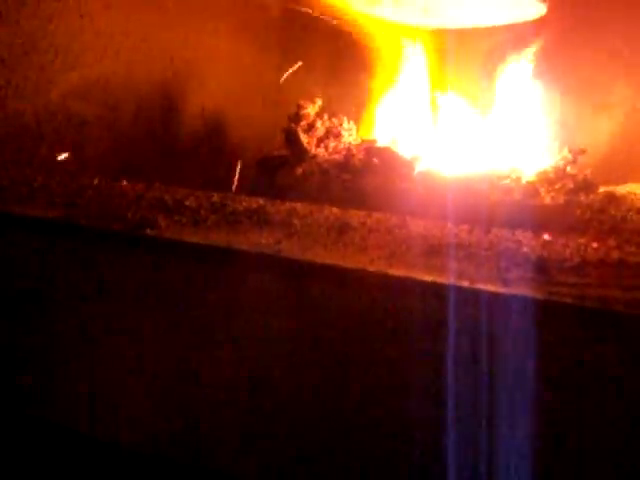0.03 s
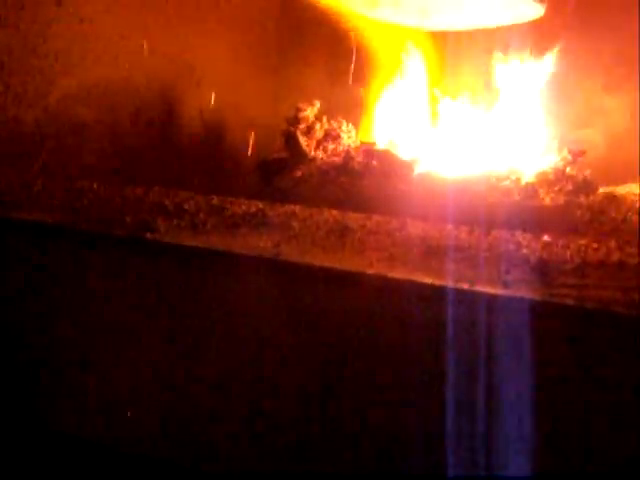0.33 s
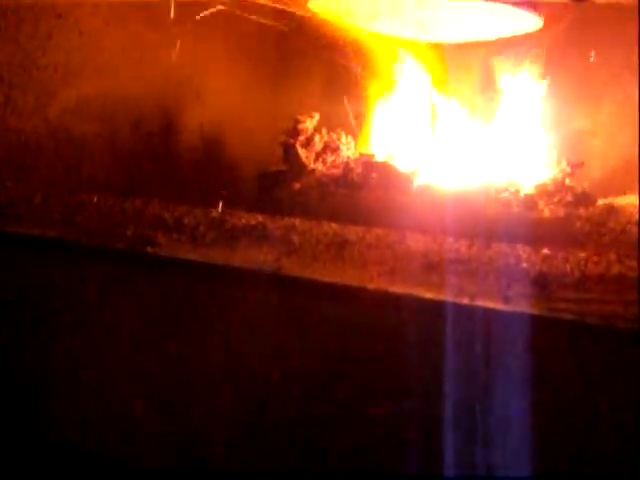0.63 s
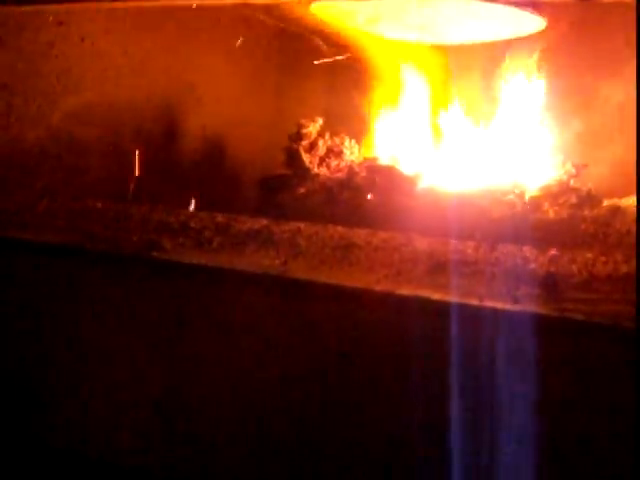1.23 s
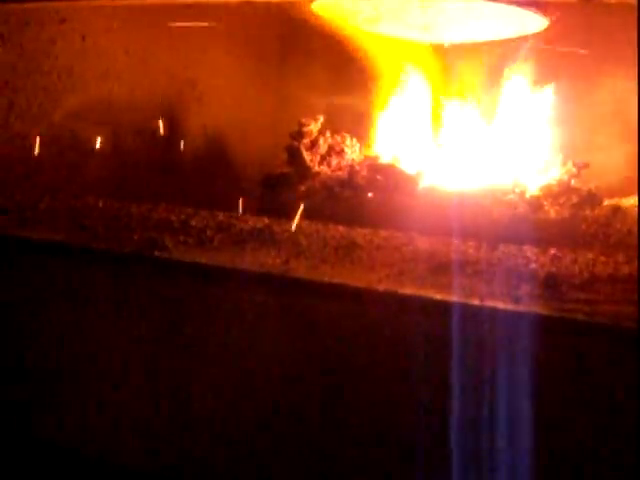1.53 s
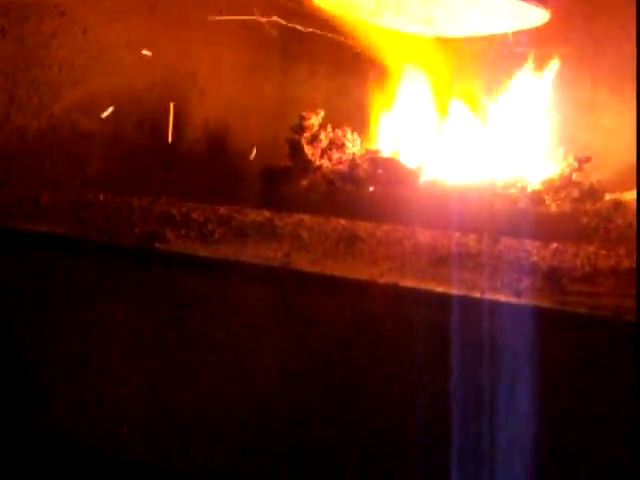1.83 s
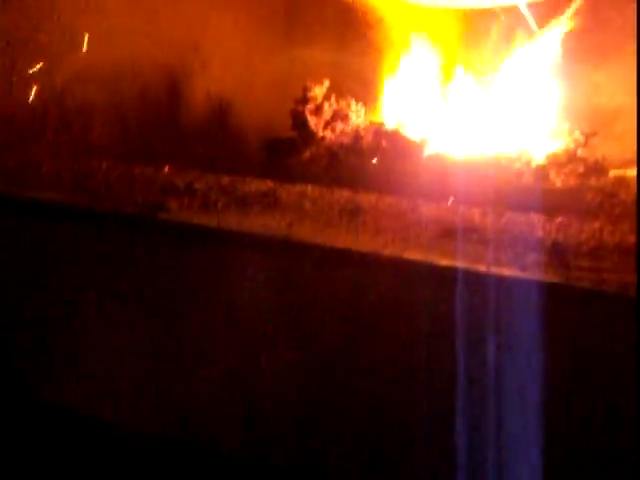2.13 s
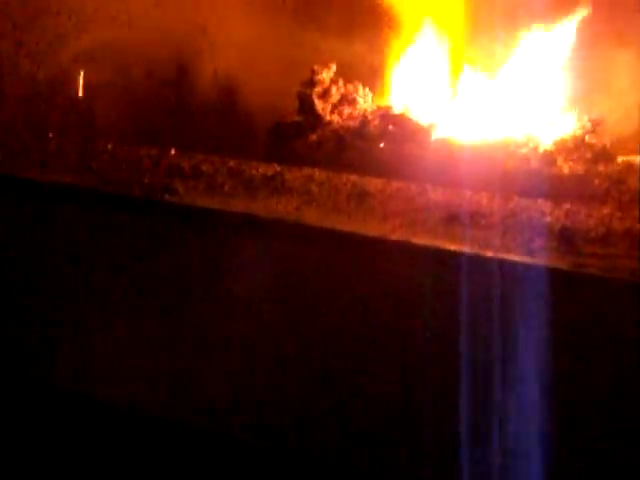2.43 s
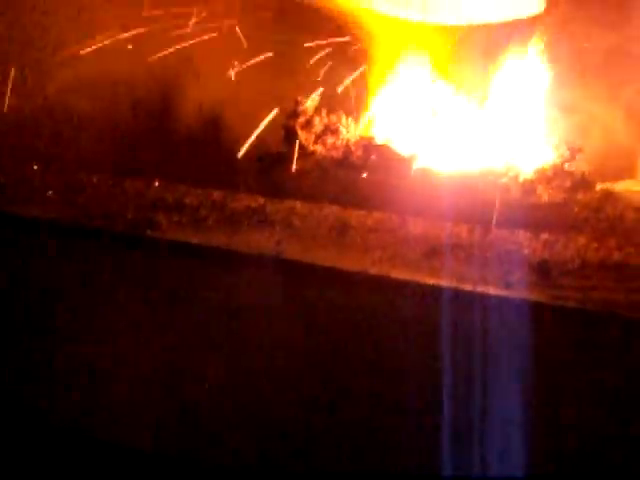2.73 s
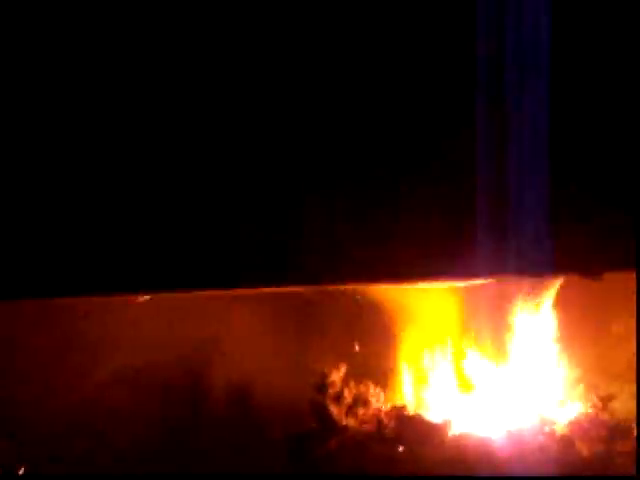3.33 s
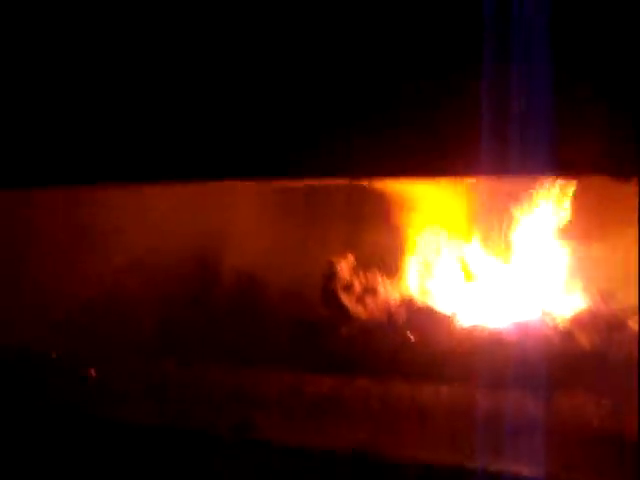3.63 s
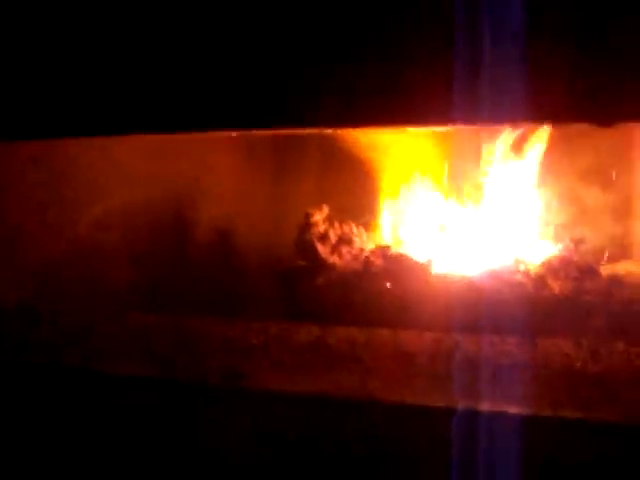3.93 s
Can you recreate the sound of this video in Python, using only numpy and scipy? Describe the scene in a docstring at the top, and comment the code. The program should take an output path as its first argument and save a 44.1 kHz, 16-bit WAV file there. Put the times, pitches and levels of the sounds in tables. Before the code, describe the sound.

Furnace flames roar steadily over a low, uneven rumble, close by at the open door. Forced air hisses evenly through the burning coal, with one clear snap early on and faint crackling all the way through.

```python
"""Coal furnace at the open fire door

A coal fire burns under forced draught in an iron furnace. The flames rumble in the low modes
of firebox and flue, drone in the standing waves and roar through the higher resonances.
The blower's air hisses through the coal bed, and the coal crackles faintly, with one clear snap."""
import sys
import numpy as np
from scipy.fft import rfft, irfft, next_fast_len
from scipy.io import wavfile
from scipy.ndimage import uniform_filter1d, map_coordinates

SR = 44100
rng = np.random.default_rng(int(sys.argv[2]) if len(sys.argv) > 2 else 0)


def waveform_to_disk(signal):
    """Save audio, clipped to [-1, 1], as 16-bit WAV at the path in sys.argv[1]."""
    frames = np.transpose(np.atleast_2d(signal))
    scaled = np.clip(frames, -1, 1) * 32767
    samples = np.round(scaled).astype(np.int16)
    wavfile.write(sys.argv[1], SR, samples)


N = 176400

# Deepest modes, of firebox and flue together. Each row: centre in Hz, width in Hz, relative level in dB.
FLUE_MODES = [(43, 15, -11.5), (59.9, 9.7, -0.5), (84.7, 13.4, 0)]
# Surges of the flames. Each row: time in seconds, gain on the rumble in dB.
SURGES = [(0.0, -24), (0.56, -30), (0.62, -19.5), (0.75, -30.5), (0.77, -20), (0.86, -27), (0.89, -17),
          (0.92, -30), (0.96, -27), (1.75, -26.5), (1.93, -30), (2.06, -22.5), (2.16, -33), (2.18, -27.5),
          (3.56, -26.5), (3.6, -39), (3.74, -25), (4.0, -28.5)]
# Standing waves across the firebox. Each row: centre in Hz, width in Hz, relative level in dB.
STANDING_WAVES = [(107, 19, -6), (134, 24, 0.5), (175.4, 18, -4.5), (210, 20, -5), (244, 26, -5),
                  (272.2, 13.6, 1)]
# Higher resonances of firebox and doorway. Each row: centre in Hz, width in Hz, relative level in dB.
FIREBOX_MODES = [(324.6, 25.3, -0.5), (421, 46, -1.5), (522, 27, -2.5), (556, 28, -2.5), (733, 36, -3.5),
                 (802, 54, -6), (890, 38, -4), (974, 77, -0.5), (1112.4, 47, 0.5), (1156, 47, 0),
                 (1548, 47, -10.5), (1652, 88, -5.5), (1800, 80, -8.5), (1923, 37, -5.5), (2003, 55, -7.5),
                 (2130, 42, -10)]
# The roar's floor between those resonances. Each row: frequency in Hz, relative level in dB.
ROAR_FLOOR = [(110, -23), (300, -19), (640, -5.5), (900, -8.5), (1300, -12), (2200, -23.5), (3000, -47),
              (6000, -90.5)]
# Tone of the air in the coal bed. Each row: frequency in Hz, relative level in dB.
HISS_SPECTRUM = [(2000, -0.5), (2200, -4), (2350, 0.5), (2560, 0.5), (2680, -2.5), (2800, -2), (3020, -8.5),
                 (3260, -2), (3380, -5.5), (3530, -5), (3820, -9), (4000, -2.5), (4350, -9.5), (5000, -13),
                 (5650, -12.5), (6300, -13), (6900, -16), (7500, -16.5), (8000, -25.5), (8450, -30.5),
                 (8900, -46.5)]
# Strength of the draught. Each row: time in seconds, gain in dB.
DRAUGHT_GAIN = [(0, 0), (1, 0.1), (2, -0.04), (2.85, 0.3), (3.1, -.5), (4, 0)]
# Clear snaps of the coal. Each row: start in seconds, level in dB before the EQ.
COAL_SNAPS = [(.4132, -26)]

RUMBLE_DB, DRONE_DB, ROAR_DB, HISS_DB = -0.5, -35.5, -34, -43
FLICKER_PER_S, ROAR_FLICKER_DB, HISS_FLICKER_DB = 22, 0.45, 0.5
HISS_GROWTH = 1.8  # the hiss follows the draught more than the roar does


def amp(db):
    """Decibels to gain."""
    return 10 ** (np.asarray(db) / 20)


def unit(x):
    """Scale to rms 1."""
    return x / np.sqrt(np.mean(x ** 2) + 1e-20)


def eq_curve(points, hz):
    """Gain of an EQ drawn through (Hz, dB) points on a log frequency axis."""
    point_hz, db = np.transpose(points)
    return amp(np.interp(np.log(hz + 1), np.log(point_hz + 1), db))


def fader(points):
    """A level for every sample, ramping between (seconds, dB) points."""
    times, db = np.transpose(points)
    return np.interp(np.arange(N) / SR, times, db)


def wobble(rate):
    """A smooth random curve, rate knots a second."""
    return map_coordinates(rng.standard_normal(N // 100), [np.arange(N) * rate / SR], mode="wrap")


def filtered(x, response):
    """Shape x with a gain given as a function of frequency."""
    size = next_fast_len(N + SR // 2)
    hz = np.fft.rfftfreq(size, 1 / SR)
    return irfft(rfft(x, size) * response(hz), size)[:N]


def low_cut(hz, edge_hz, order):
    """Gain of a high-pass."""
    return 1 / np.sqrt(1 + (edge_hz / (hz + 1)) ** (2 * order))


def resonances(modes, hz):
    """Gain of a bank of steep-sided resonances whose powers add."""
    power = sum(amp(db) ** 2 / (1 + np.sqrt(2) * ((hz - centre) / width) ** 2) ** 2
                for centre, width, db in modes)
    return np.sqrt(power)


def turbulence(response):
    """Noise coloured by a response, at rms 1."""
    return unit(filtered(rng.standard_normal(N), response))


def flame_rumble(window_s=0.12, compression=0.44):
    """Unsteady burning drives the low modes; the fixed air supply holds its mean power in check."""
    boom = turbulence(lambda hz: resonances(FLUE_MODES, hz) * low_cut(hz, edge_hz=28, order=2))
    power = np.abs(uniform_filter1d(boom ** 2, int(window_s * SR))) + 1e-6
    steadied = unit(boom / power ** (compression / 2))
    return amp(RUMBLE_DB + fader(SURGES)) * steadied


def firebox_drone(gain_db):
    """The flames keep the firebox's standing waves sounding."""
    return amp(DRONE_DB + gain_db) * turbulence(lambda hz: resonances(STANDING_WAVES, hz))


def flame_roar(gain_db):
    """Turbulent flames sound through the firebox's resonances, over a broad floor of noise."""
    roar = turbulence(lambda hz: np.hypot(resonances(FIREBOX_MODES, hz), eq_curve(ROAR_FLOOR, hz)))
    return amp(ROAR_DB + gain_db) * roar


def air_hiss(gain_db):
    """The blower's air rushes through the gaps in the coal."""
    hiss = turbulence(lambda hz: eq_curve(HISS_SPECTRUM, hz) * low_cut(hz, edge_hz=2165, order=12))
    return amp(HISS_DB + gain_db) * hiss


def coal_crackle(cracks_per_s=40, faint_db=-47, spread_db=2.5, t60_s=0.008):
    """Splitting coal: each crack is a very short, bright burst of noise."""
    t = np.arange(SR // 40) / SR
    count = int(cracks_per_s * N / SR)
    faint = [(rng.uniform(0, N / SR), faint_db + spread_db * rng.normal()) for _ in range(count)]
    cracks = np.zeros(N + len(t))
    for start_s, db in list(COAL_SNAPS) + faint:
        burst = amp(db - 60 * t / t60_s) * rng.standard_normal(len(t))
        cracks[int(start_s * SR):][:len(t)] += burst
    rolloff = [(6000, 4.5), (7500, -5), (8800, -21)]  # Hz, dB
    return filtered(cracks[:N], lambda hz: low_cut(hz, edge_hz=2500, order=2) * eq_curve(rolloff, hz))


def scene():
    """Drone, roar and hiss ride the draught; roar and hiss share the flicker of the flames."""
    draught_db = fader(DRAUGHT_GAIN)
    flicker = wobble(FLICKER_PER_S)
    lows = flame_rumble() + firebox_drone(draught_db)
    roar = flame_roar(draught_db + ROAR_FLICKER_DB * flicker)
    hiss = air_hiss(HISS_GROWTH * draught_db + HISS_FLICKER_DB * flicker)
    return (lows + roar + hiss + coal_crackle())[None]


def record(dry):
    """Master EQ: a narrow notch in the treble and a hard cut of the top end."""
    notch_hz, half_width_hz, top_hz = 4660, 170, 8877

    def master_eq(hz):
        notch = np.sqrt(1 - 1 / (1 + ((hz - notch_hz) / half_width_hz) ** 2))
        return notch * (hz < top_hz)

    return np.array([filtered(channel, master_eq) for channel in dry])


dry = scene()
out = record(dry)
waveform_to_disk(out)
```